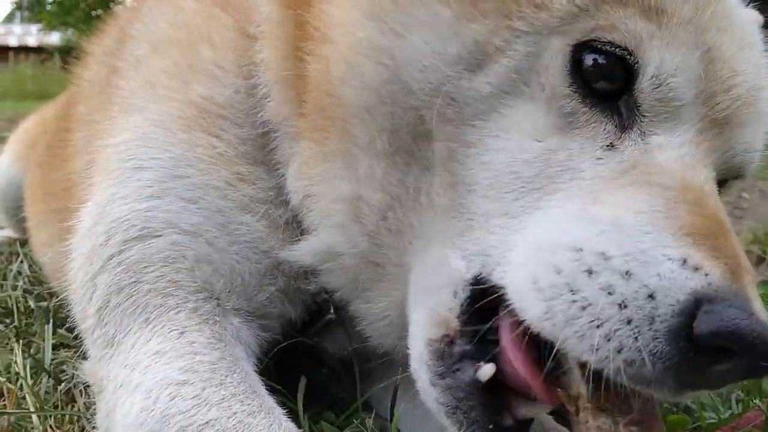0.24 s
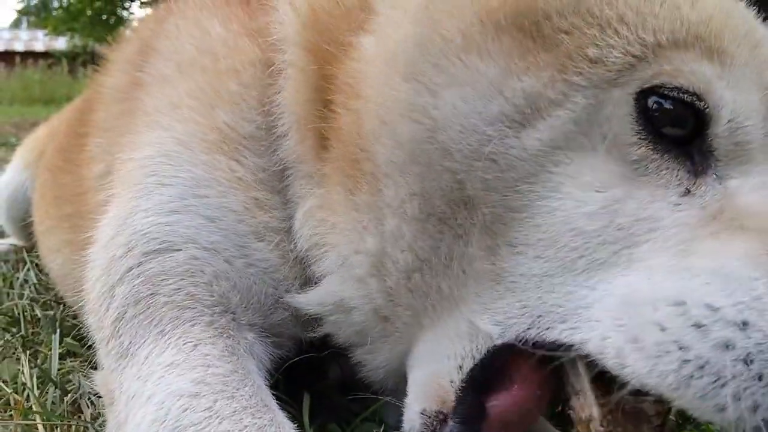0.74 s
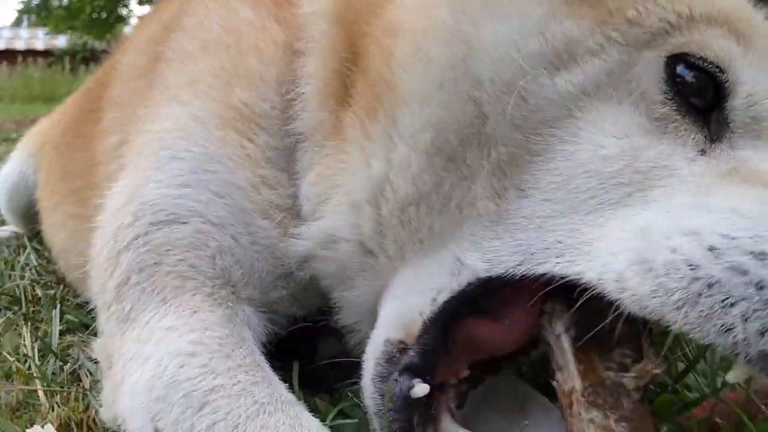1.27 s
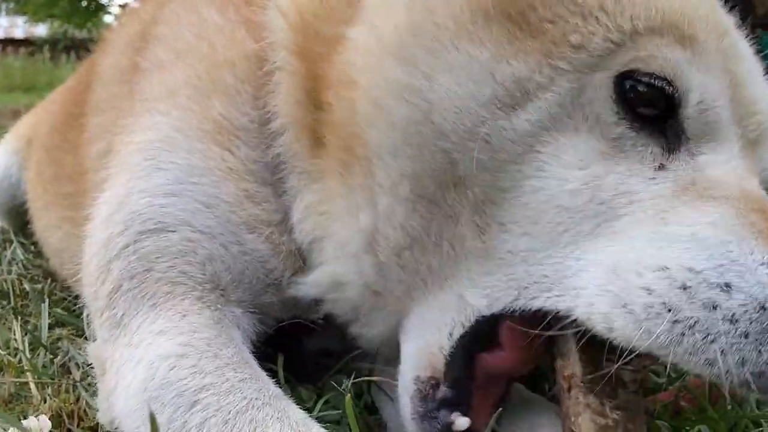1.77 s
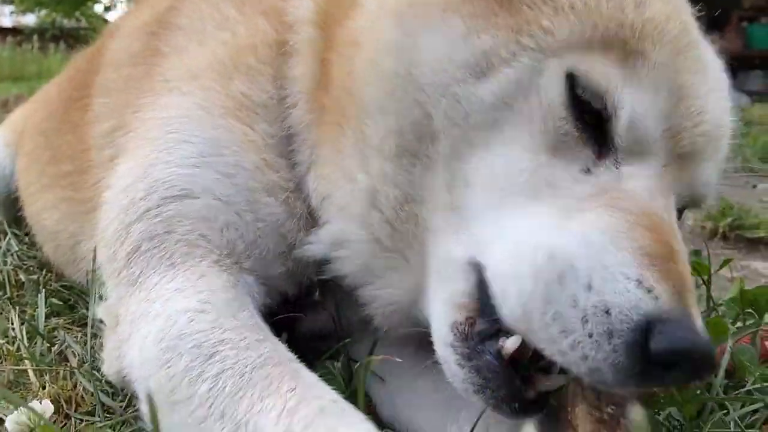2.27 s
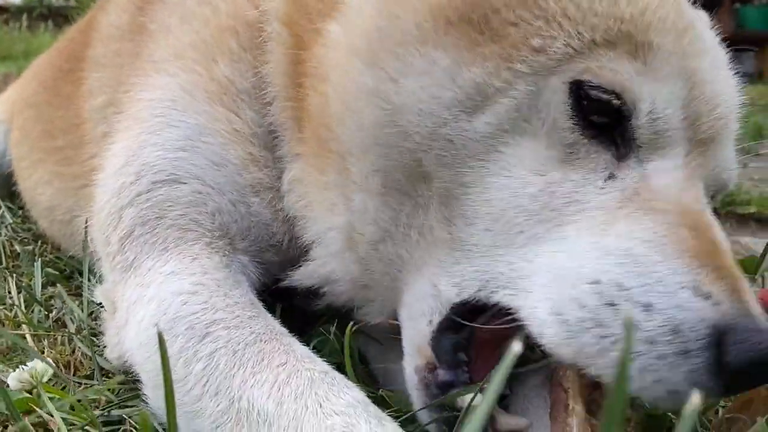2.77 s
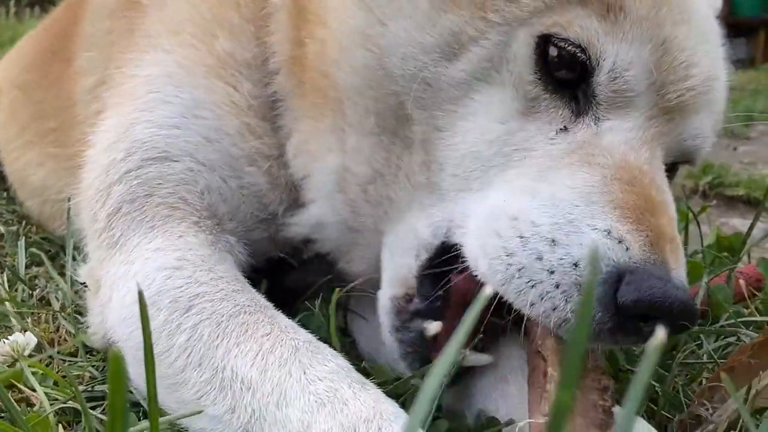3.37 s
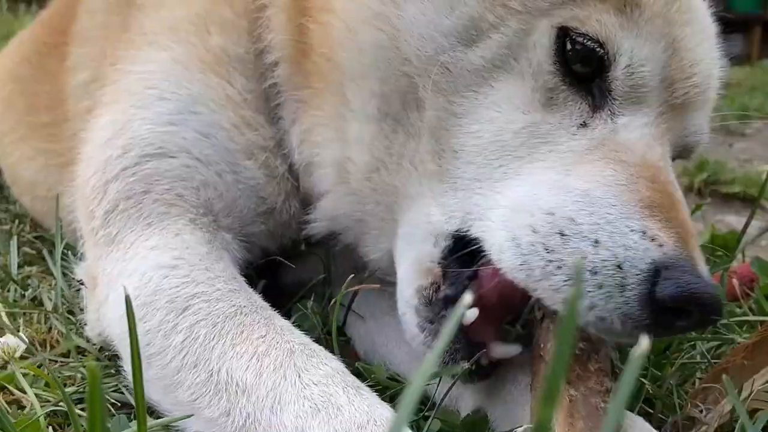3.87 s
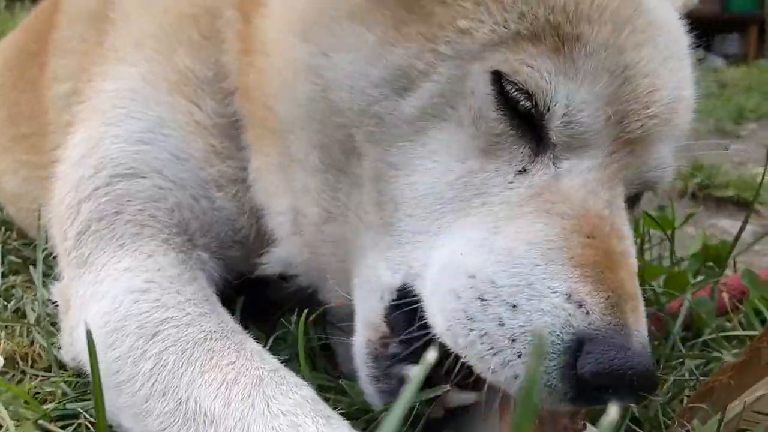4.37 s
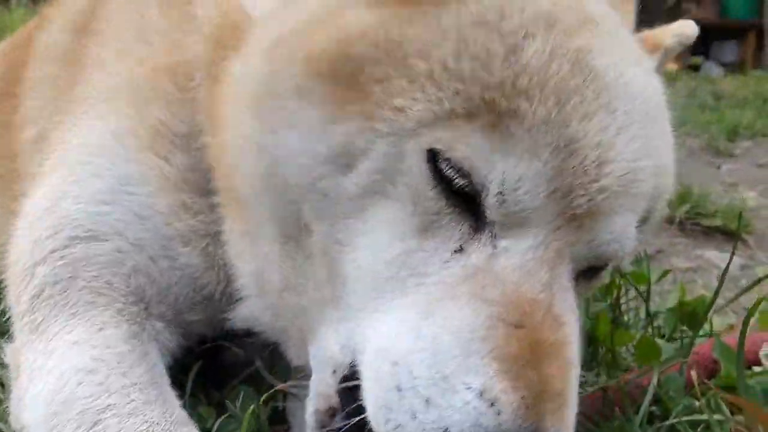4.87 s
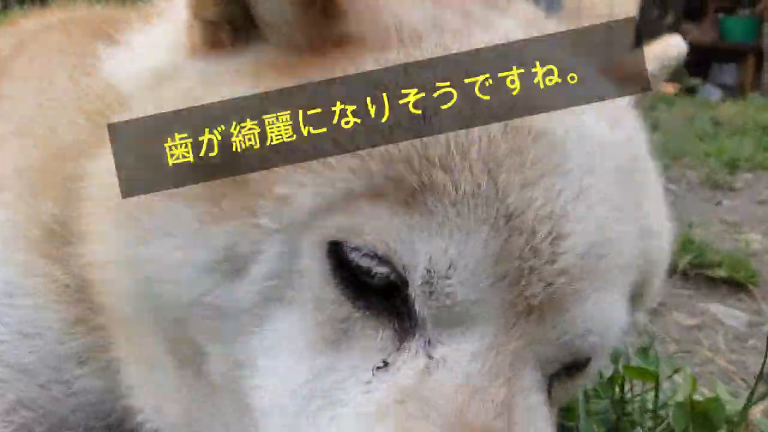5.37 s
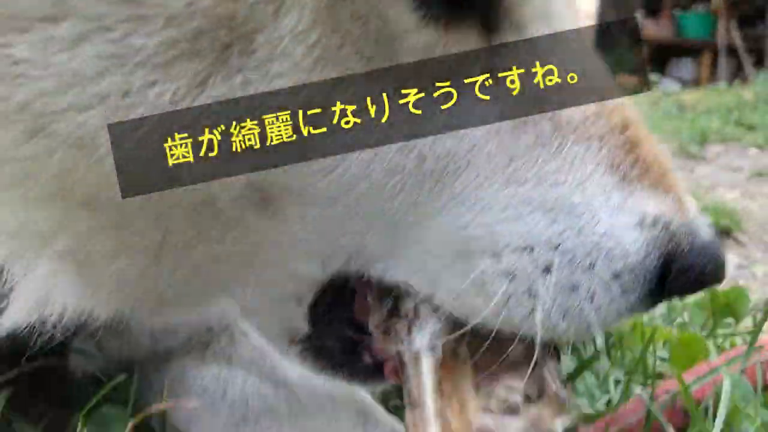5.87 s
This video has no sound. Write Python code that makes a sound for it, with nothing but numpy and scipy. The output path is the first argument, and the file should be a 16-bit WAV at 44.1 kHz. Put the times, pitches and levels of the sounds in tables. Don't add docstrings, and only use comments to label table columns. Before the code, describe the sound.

Close stereo pickup by a phone on grass: a dog gnaws a hard bone. A crackling crunch comes almost at once, a bigger, louder one just before one second, then mostly quiet with small ticks. One sharp crack stands out past two seconds, another softer one at about three and a half. Small nose puffs, wet squeaks and tooth taps fill in, over low distant traffic hum, leaf hiss and a wind bump at the end.

```python
import sys
import numpy as np
from scipy import signal
from scipy.fft import rfft, irfft, next_fast_len
from scipy.io import wavfile
from scipy.ndimage import uniform_filter1d

SR = 44100
rng = np.random.default_rng(int(sys.argv[2]) if len(sys.argv) > 2 else 0)


def log_audio(samples):
    frames = np.atleast_2d(samples).T
    limited = np.clip(frames, -1, 1)
    pcm = np.round(limited * 32767).astype(np.int16)
    wavfile.write(sys.argv[1], SR, pcm)


def level_to_linear(level):
    exponent = np.asarray(level, float) / 20
    return 10 ** exponent


N = 270333
LEAD_MS = 16


def band(x, hz, width_hz):
    return signal.lfilter(*signal.iirpeak(hz, hz / width_hz, fs=SR), x)


def to_peak(x, db, ms):
    return x * level_to_linear(db) / np.sqrt(2 * uniform_filter1d(x ** 2, int(ms * SR / 1000)).max())


def add(out, s, sound):
    i = int(s * SR)
    out[:, i:i + sound.shape[1]] += sound[:, :N - i]


def interaural(left_db, right_db):
    return level_to_linear(np.array([[left_db], [right_db]]))


def fractures(ms, chance, spread_db):
    t = (np.arange(chance.shape[-1]) / SR * 1000 - LEAD_MS) / ms
    release = np.exp(-(t / np.where(t < 0, .4, .7)) ** 2)
    skirts = 0.12 * np.exp(-np.abs(t - .4) / np.where(t < .4, 3.8, 5.1))
    return (release + skirts) * chance[0] * level_to_linear(spread_db * chance[1])


# centre t/s, peak level/dB, length/ms, splinter f/Hz, bright edge level/dB
BONE_SNAPS = [(0.2114, -26, 2.2, 3950, -2), (0.2156, -15.5, 3.3, 3900, 1), (0.219, -14, 1.4, 2200, -9),
              (0.2459, -22, 5.4, 3700, -2), (0.7475, -26, 3.5, 3660, -18), (0.8106, -25, 1.6, 2440, -19),
              (0.82, -26, 1.6, 3300, -14), (0.872, -18, 0.78, 3940, 2), (0.915, -20.5, 1.08, 3770, 4),
              (0.9217, -20.5, 2.4, 3940, -3.5), (0.925, -29, 1.7, 4590, -5), (0.941, -28, 4.3, 3300, 2),
              (0.945, -18, 2.83, 3770, -1), (0.9485, -9.5, 2.8, 3880, -3), (0.9536, -7, 2.4, 2430, -4),
              (0.959, -15, 5.4, 2400, -24), (1.0164, -13, 2, 4070, -12), (1.02, -27, 2.1, 2000, -6),
              (2.345, -17, 1.4, 3010, 0), (2.357, -22, 4.1, 2620, 1), (2.366, -9, 2.1, 3490, -10),
              (2.3679, -6.5, 1.4, 1970, -13), (3.6668, -29, 7.2, 4000, -12), (3.674, -12, 1.2, 5400, -8.5)]
# centre t/s, peak level/dB, splinter f/Hz, bright edge level/dB
BONE_CHIPS = [(0.1363, -28.5, 3100, -22), (0.626, -33, 3780, 4), (1.102, -29, 2710, 13.5),
              (1.1072, -24, 4630, 3), (1.2054, -31, 4700, -7), (1.472, -32.5, 2820, -15),
              (1.569, -33, 2900, -15), (1.7961, -34, 4250, 11.5), (2.0364, -30.5, 3080, -20),
              (2.057, -30.5, 3560, -19), (2.064, -30, 2205, -13), (2.567, -29, 3140, -2),
              (2.606, -29.5, 2030, 5), (2.8068, -34, 4600, -8), (2.813, -36, 3800, -10),
              (3.3715, -32, 3030, -5), (3.5334, -31, 2324, -21), (3.607, -32, 1900, -19),
              (3.7012, -34, 3380, -6), (4.114, -32, 3300, -14), (4.146, -37, 3600, -15),
              (4.1613, -33, 2080, -15), (4.7092, -28, 2390, -23), (4.7938, -24.5, 3100, -4),
              (4.7979, -24, 1850, 2), (4.8005, -27, 5030, -6), (5.2083, -35, 3050, -18),
              (5.2372, -30, 1980, -29), (5.421, -36, 2950, 9), (5.8373, -40, 2510, -11)]
CHIP_MS = 2.85


def cracks(out, table):
    edge_hz, edge_width_hz = 6150, 4200
    shadow_hz = 4800
    chance = rng.standard_normal((len(table), 4, 1600))
    for (s, db, ms, hz, edge_db), c in zip(table, chance):
        left_db = db - 12 + 5.5 * c[3, -1]
        burst_ms = max(ms - .7, .25)
        force = fractures(burst_ms, c[:2], spread_db=4.5)
        chips = fractures(burst_ms, c[[2, 1]], spread_db=4.5)
        splinter = band(band(force, hz, 0.078 * hz), hz, 4.2 * hz)
        body = splinter + 0.37 * band(band(force, 2670, 3600), 1500, 5500)
        edge = band(band(chips, edge_hz, edge_width_hz), edge_hz, edge_width_hz)
        right = to_peak(to_peak(body, 0, .8) + to_peak(edge, edge_db, .8), db, .8)
        ground_echoes = .35 * c[3, :24] * np.exp(-np.arange(24) / 9)
        paths = np.r_[0, 1, ground_echoes]
        left = band(signal.lfilter(paths, 1, right), shadow_hz, 20000)
        add(out, s - LEAD_MS / 1000, np.array([to_peak(left, left_db, .8), right]))


# start t/s, length/s, peak level/dB, hollow bone f/Hz
MOLAR_CRUNCHES = [(0.221, .008, -30, 525), (0.25, .003, -24, 900), (0.31, .009, -35, 1080),
                  (0.756, .005, -31.5, 1380), (0.814, .011, -29, 450), (0.851, .02, -34.5, 1290),
                  (0.884, .011, -45, 1190), (0.927, .002, -38, 1280), (0.964, .002, -27.5, 909),
                  (1.029, .008, -33, 1010), (2.071, .014, -44.5, 925), (2.571, .003, -47, 900),
                  (3.53, .006, -39, 800), (3.655, .009, -41, 1140), (3.675, .001, -20.5, 880),
                  (0.204, .002, -42, 1500), (0.232, .007, -33, 520), (0.268, .002, -41, 1500),
                  (0.762, .007, -31.5, 1700), (0.899, .005, -32.5, 420), (0.184, .002, -43, 1500),
                  (2.905, .004, -40, 900), (2.998, .003, -50, 900)]


def crushing():
    gap_s = 0.0032
    break_ms, break_hz, edge_db = 3.4, 3300, -20
    rub_db, rub_ms = -12, 7.8
    breaks, rubs = [], []
    chance = np.clip(rng.standard_normal((len(MOLAR_CRUNCHES), 12, 5)), -2, 2)
    for (start, length, db, bone_hz), c in zip(MOLAR_CRUNCHES, chance):
        step = np.arange(len(c))
        s = start + gap_s * (step + 0.22 * c[:, 0] * (step > 0))
        size_db = db + 4.5 * c[:, 1] - 60 * (s > start + length)
        lengths_ms = break_ms * level_to_linear(0.92 * c[:, 2])
        rings_hz = break_hz * level_to_linear(1.9 * c[:, 3])
        breaks += zip(s, size_db, lengths_ms, rings_hz, edge_db + 4 * c[:, 4])
        rubs += [(at, level + rub_db, bone_hz, rub_ms) for at, level in zip(s[::3], size_db[::3])]
    return breaks, rubs


# t/s, peak level/dB, ring f/Hz
FIBRES = [(0.127, -33, 4260), (0.1296, -26.5, 3360), (0.1319, -35, 6030), (0.1342, -34.5, 4090),
          (0.184, -29, 3790), (0.2067, -21, 3960), (0.214, -21, 2450), (0.2164, -9, 4130),
          (0.2355, -28, 6500), (0.2502, -22, 4440), (0.2549, -30, 7020), (0.2666, -30, 6330),
          (0.312, -36, 2630), (0.7456, -26, 3830), (0.7507, -24, 3530), (0.753, -30, 3790),
          (0.7665, -30, 3790), (0.7701, -32, 4010), (0.7724, -32, 3700), (0.8082, -29, 2630),
          (0.81, -28.5, 2677), (0.8164, -22, 3830), (0.8217, -19, 3600), (0.8501, -31.5, 6330),
          (0.852, -23, 6420), (0.861, -27, 3920), (0.8655, -35.5, 7360), (0.8945, -28, 3750),
          (0.8961, -28, 3190), (0.9033, -27, 3060), (0.906, -28, 6420), (0.9199, -18, 6680),
          (0.9313, -27, 7020), (0.9369, -23, 3620), (0.9392, -26, 3490), (0.9429, -19.5, 5990),
          (0.948, -8, 6440), (0.9494, -12, 3960), (0.964, -20, 2200), (1.019, -22, 6550),
          (1.021, -15.5, 2060), (1.0271, -19.5, 2580), (1.0291, -22, 2630), (1.101, -23, 7490),
          (1.2016, -28.5, 3570), (1.808, -28, 7320), (2.032, -26, 3360), (2.0636, -32, 2280),
          (2.0688, -34, 2370), (2.356, -23, 2410), (2.57, -28, 3270), (2.807, -20.5, 4070),
          (3.5322, -27, 3660), (3.661, -30, 5170), (3.6639, -30, 4260), (3.6778, -20, 3300),
          (3.7022, -39, 1510), (4.7159, -29, 3190), (5.4198, -20, 6600), (5.719, -36.5, 1510),
          (.2138, -24, 6800), (.2159, -18.5, 6800), (.2225, -28, 7000), (.225, -28, 6800),
               (.2273, -23, 7100), (.2292, -30, 6600), (.239, -33, 7000), (.2408, -33, 7200),
               (.3107, -32.5, 7000), (0.3175, -33, 2200), (.3194, -34, 7000), (.32, -27, 3400),
               (.7463, -31, 6600), (.7608, -29, 6400), (0.7646, -31, 3900), (.8079, -33, 7100),
               (.8548, -35.5, 6500), (.8604, -32, 6800), (.8624, -29, 2400), (.8859, -32, 6400),
               (.8928, -27.5, 4100), (.9039, -30, 6600), (.9047, -32, 2800), (0.9066, -31, 2600),
               (0.925, -17, 6800), (.9377, -31, 6600), (.9395, -28, 6600), (0.9435, -20, 6500),
               (0.9484, -11, 6540), (0.9544, -10, 7000), (1.0205, -21.5, 6500), (1.0239, -27, 6800),
               (1.0251, -29, 6200), (1.0334, -32, 5800), (2.365, -9.5, 2900), (3.6732, -14, 3300),
               (3.7018, -35, 7000), (5.237, -27, 3300), (0.2183, -10.5, 2320), (2.3677, -2.5, 3700),
               (4.7093, -33, 2600), (3.606, -29, 2500), (4.7997, -25, 5800), (2.6068, -27, 5800),
               (.2443, -23, 6300)]


def pricks(out):
    left_db, left_lag_ms = -16.5, .12
    table = FIBRES
    chance = rng.standard_normal((len(table), 2, 64))
    for (s, db, hz), c in zip(table, chance):
        blow = np.zeros((2, 400))
        blow[:, :64] = .13 * c * np.exp(-np.arange(64) / 16)
        blow[[0, 1], [int(left_lag_ms * SR / 1000), 0]] = np.sign(c[0, 0])
        click = band(band(blow, 3000, 5300), 2900, 6300)
        ring = band(band(blow, hz, 890), hz, 3000) + 0.21 * click
        ring = ring / np.abs(signal.hilbert(ring)).max(axis=1, keepdims=True)
        add(out, s - .00025, ring * interaural(db + 1.5 + left_db, db + 1.5))


# centre t/s, peak level/dB, ring f/Hz, length/ms
TOOTH_KNOCKS = [(0.218, -36, 1050, 5.8), (0.2498, -30, 480, 6.12), (0.266, -37, 407, 4.3),
                (0.3186, -40, 1090, 7.4), (0.8175, -31, 403, 7.1), (0.9414, -35.5, 1640, 8.3),
                (1.021, -32, 1370, 5.3), (1.027, -28.5, 946, 6.6), (2.0685, -40, 880, 19),
                (2.347, -42, 1700, 5.66), (2.3557, -42, 1300, 12), (2.3695, -14, 926, 4.65),
                (3.534, -39, 855, 7.6), (3.666, -28, 422, 5.5), (3.6731, -33, 891, 4.6),
                (4.15, -38, 870, 6.5), (4.1539, -40, 930, 6.6), (4.1851, -45.5, 870, 11),
                (4.719, -34.5, 709, 5.7), (4.795, -40, 1790, 7.5), (4.801, -38.5, 1300, 5),
                (5.7102, -40, 668, 3.5), (5.7218, -32, 725, 4.1)]
# centre t/s, peak level/dB, ring f/Hz
TOOTH_TAPS = [(0.213, -42, 1550), (0.8109, -32, 458), (0.916, -40.5, 1260), (0.922, -41.5, 1290),
              (0.9511, -24, 1520), (0.9604, -26, 870), (1.533, -38.5, 950), (2.0577, -33, 980),
              (2.2294, -42, 630), (2.376, -43, 1030), (2.3709, -23, 557), (2.608, -43.5, 920),
              (2.976, -44, 730), (3.608, -29.5, 1128), (3.703, -35, 1037), (3.753, -41.5, 520),
              (3.753, -40, 1050), (4.162, -29.5, 865), (4.7101, -28, 715), (4.927, -39, 463),
              (5.162, -30.5, 643), (5.2095, -40, 570), (5.238, -30, 720), (5.238, -36, 1360),
              (5.2475, -39, 540), (5.2966, -37.5, 520), (5.2977, -43, 1145), (5.7556, -41, 668),
              (5.757, -40, 1700), (5.8369, -37, 560)]
TAP_MS = 3.6


def knocks(out, table):
    chance = rng.standard_normal((len(table), 2, 2400))
    for (s, db, hz, ms), c in zip(table, chance):
        thud_db = -4.5 - 6 * np.log2(hz / 500)
        grinding = np.clip((ms - 3.8) / 16, 0, 1)
        force = fractures(max(ms - 2.6, .3), c, spread_db=4.5) * grinding
        force[int((LEAD_MS - .3 * ms) * SR / 1000)] += 2.0 * np.sign(c[0, 0])
        force = signal.lfilter(*signal.butter(2, 2300, fs=SR), force)
        ring = band(force, hz, 90 + 0.067 * hz) + 0.293 * force
        ring = to_peak(band(band(ring, hz, 1.56 * hz), hz, 2.4 * hz), db + 0.24, 1.95)
        jaw = to_peak(band(band(force, 355, 588), 350, 1140), db + thud_db + 3.5, 0.97)
        skull = to_peak(band(force, 124, 180), db - 26.5, 2.8)
        side_db = 0.84 + 5.0 * hz / 1000
        ring = ring * interaural(-side_db / 2, side_db / 2)
        thud = (jaw + skull) * interaural(1.5, -1.5)
        add(out, s - LEAD_MS / 1000, ring - thud)


# start t/s, length/s, level/dB
BITE_GRIT = [(0.21, 0.024, -36), (0.24, 0.01, -37), (0.308, 0.016, -40), (0.746, 0.03, -44),
             (0.801, 0.019, -41.5), (0.852, 0.023, -50), (0.895, 0.0196, -45), (0.94, 0.0267, -31.5),
             (1.013, 0.017, -31), (2.054, 0.03, -47.5), (2.358, .012, -35), (3.511, 0.0134, -57),
             (3.66, .021, -33.5), (4.139, 0.019, -47), (4.789, 0.01, -42)]


def grit(out):
    for s, length, db in BITE_GRIT:
        chance = rng.standard_normal((3, SR // 20))[:, :int(length * SR)]
        swell = np.sin(np.pi * np.linspace(0, 1, chance.shape[1])) ** .5
        grains = chance[:2] * level_to_linear(6.9 * chance[2]) * swell
        grains = np.pad(grains, ((0, 0), (0, SR // 200)))
        grains = band(grains, 1870, 1800) + .5 * band(grains, 4600, 1900)
        add(out, s, interaural(db - 9, db) * grains / grains.std())


# t/s,
# peak level/dB, ring f/Hz, swell/ms
TOKS = [(5.717, -24, 1340, 1.66), (5.7171, -36.5, 1660, 1.45), (0.309, -38, 1088, 5.3),
        (3.701, -40, 1047, 3), (2.064, -39, 1255, 2.3), (.226, -42.5, 906, 1.3),
        (.227, -40, 330, 2.1), (0.2472, -34.5, 1110, 1.2), (.2503, -43.5, 800, 1.3),
        (.264, -38, 334, 1.8), (0.7527, -45, 887, 1.3), (.7636, -46, 850, 1.4),
        (0.8105, -37, 1100, 0.99), (.8155, -37, 373, 2.1), (0.9019, -40, 398, 1.34),
        (0.9035, -39, 1000, 1.2), (0.9418, -47, 1005, 1.2), (2.365, -30, 228, 2),
        (2.4586, -39, 1030, 0.76), (2.482, -36.5, 1010, 0.84), (2.52, -39, 990, 0.58),
        (3.468, -42, 864, 1.2), (3.482, -45, 1391, 2.6), (3.53, -42.5, 257, 2.34),
        (3.66, -38, 1210, 1.4), (3.672, -42, 246, 3.7), (3.698, -45.5, 332, 1.3),
        (4.151, -32.5, 1240, 0.71), (4.925, -45, 1175, 1.3), (5.208, -44, 890, 1.1),
        (5.836, -45, 980, 1.1), (4.7106, -35, 1500, 1.1), (5.2362, -39, 1640, 1.3)]


def toks(out):
    t = np.arange(SR // 20) / SR
    for s, db, hz, ms in TOKS:
        swell = t * 1000 / ms * np.exp(1 - t * 1000 / ms)
        add(out, s, level_to_linear(db) * swell * np.sin(2 * np.pi * hz * t) * interaural(-3.0, 2.5))


def airflow(length):
    air = rng.standard_normal((3, SR // 4))[:, :int(length * SR)]
    along = np.linspace(0, 1, air.shape[1])
    flow = level_to_linear(15 * band(air[0], 110, 120)) * np.sin(np.pi * along) ** 0.23
    return air, along, flow


def add_puff(out, s, db, puff):
    add(out, s, level_to_linear(db) * puff / puff.std() * interaural(-3.1, 2.4))


# t/s, length/s, level/dB, nose f/Hz
NOSE_PUFFS = [(.118, 0.027, -54, 1390), (0.343, 0.013, -55, 1090), (0.789, 0.041, -58, 601),
              (1.999, 0.019, -54.5, 2030), (2.165, 0.159, -57, 1120), (2.385, 0.18, -52.5, 1050),
              (2.45, 0.07, -58, 1950), (2.64, 0.063, -58.5, 1100), (3.134, 0.091, -55.5, 1190),
              (3.499, 0.036, -51.5, 225), (3.655, 0.034, -52, 1150), (3.7, 0.016, -54, 1050),
              (4.262, .11, -57, 1140), (5.856, 0.022, -57.5, 1050)]


def snorts(out):
    for s, length, db, hz in NOSE_PUFFS:
        air, _, flow = airflow(length)
        add_puff(out, s, db, band(band(air[1] * flow, hz, 150), hz, 414))


# t/s, length/s, level/dB, start f/Hz
GAP_HISSES = [(0.131, 0.039, -53.5, 4300), (0.789, 0.03, -52, 3100), (1.856, 0.056, -51.5, 4700),
              (1.908, 0.072, -58, 4220), (1.999, .022, -53.5, 4500), (2.439, 0.09, -55, 3200),
              (2.426, 0.051, -54, 4380), (2.976, 0.052, -53, 3800), (3.662, 0.0514, -57.5, 4500),
              (3.7, 0.02, -53.5, 4300), (4.259, 0.0396, -52.5, 4500), (4.29, 0.071, -60, 4400),
              (5.073, 0.087, -55, 3900), (5.848, 0.029, -52.5, 2200)]


def hisses(out):
    for s, length, db, hz in GAP_HISSES:
        air, along, flow = airflow(length)
        turns = 2 * np.pi * np.cumsum(hz * (.92 - .14 * along)) / SR
        grains = air[1:] * level_to_linear(3.6 * air[0])
        sway = signal.lfilter(*signal.butter(2, 900, fs=SR), grains)
        add_puff(out, s, db, flow * (sway[0] * np.cos(turns) + sway[1] * np.sin(turns)))


# t/s, length/s, level/dB, start f/Hz, end f/Hz
WET_SQUEAKS = [
    (3.641, 0.0082, -49, 3480, 4900),
    (3.649, 0.012, -45, 4600, 3800),
    (1.865, 0.0073, -53, 4100, 4800),
    (1.875, 0.025, -50.5, 4300, 3417),
    (2.434, 0.01, -49, 3500, 4200),
    (2.443, .008, -49, 4070, 2700),
    (2.447, .014, -51, 2720, 2550),
]


def squeaks(out):
    for s, length, db, start_hz, end_hz in WET_SQUEAKS:
        waver = uniform_filter1d(rng.standard_normal((2, SR // 20)), 40)[:, :int(length * SR)] * 6
        along = np.linspace(0, 1, waver.shape[1])
        glide_hz = start_hz + (end_hz - start_hz) * along
        turns = 2 * np.pi * np.cumsum(glide_hz * (1 + 0.043 * waver[0])) / SR
        level = level_to_linear(db + 3.5 + 3.0 * waver[1]) * np.sin(np.pi * along) ** .4
        add(out, s, level * np.sin(turns) * interaural(-6, 3.5))


# t/s, peak level/dB
SPIT_TICKS = [(0.1604, -43), (0.215, -36.5), (0.2594, -46), (0.626, -43.5), (0.8709, -55.5), (0.919, -44),
              (1.37, -42), (1.795, -46.5), (2.5656, -46), (2.806, -54), (3.3712, -45), (3.6711, -56),
              (4.7924, -56), (5.4184, -59)]


def ticks(out):
    chance = rng.standard_normal((len(SPIT_TICKS), 2, 128))
    for (s, db), c in zip(SPIT_TICKS, chance):
        decay = np.exp(-np.arange(c.shape[1]) / 22)
        add(out, s, level_to_linear(db + 10.5) * band(c * decay, 10000, 5200))


def frequencies():
    size = next_fast_len(N + N % 2, real=True)
    return size, np.arange(size // 2 + 1) * SR / size + 1


def walk(rate):
    k = int(SR / rate)
    steps = np.repeat(rng.standard_normal(N // k + 1), k)
    return 1.47 * uniform_filter1d(uniform_filter1d(steps, k), k)[:N]


# f/Hz, level/dB per Hz
GARDEN_SPECTRUM = [(15, -19.5), (30, -10), (90, -8), (230, -0.5), (420, -2.5), (800, -10), (1400, -8),
                   (5500, -10)]
# f/Hz, common share/0-1
GARDEN_COHERENCE = [(60, 0.99), (130, 0.74), (290, 0.85), (640, 0.53), (1400, 0), (3100, 0.02)]
# f/Hz, level/dB
PORT_BALANCE = [(60, -2), (700, -1), (1500, -4.5), (5000, -6), (7400, -8.5), (9600, -9.5), (10600, -1)]
# f/Hz, level/dB
MIC_RESPONSE = [(5500, 0.5), (7400, 1.5), (8300, -.5), (9200, -12), (10600, -16.5), (14100, -13.5),
                (14700, -49.5)]
# t/s, garden level/dB, wind level/dB
AIR_LEVELS = [(0, -51.5, -54), (.5, -51.5, -64), (1, -50.5, -54), (1.65, -51.5, -69), (2, -51, -59),
              (2.4, -51, -58), (3, -52, -64), (3.8, -50, -61.5), (4.5, -50.5, -62), (5.3, -50, -64.5),
              (5.8, -49.5, -61.5), (5.96, -51, -46.5), (6.04, -50.5, -56.5), (6.13, -50, -41)]


def garden():
    size, hz = frequencies()

    def read(table):
        f, value = np.transpose(table)
        return np.interp(np.log(hz), np.log(f), value)

    common, left, right = rfft(rng.standard_normal((3, size)))
    like = np.clip(read(GARDEN_COHERENCE), 0, 1)
    ports = np.sqrt(like) * common + np.sqrt(1 - like) * np.array([left, right])
    ports *= level_to_linear(read(GARDEN_SPECTRUM) + read(MIC_RESPONSE) + np.outer([1, -1], read(PORT_BALANCE)) / 2)
    out = 0
    for octave in range(-6, 5):
        share = np.cos(np.pi / 2 * np.clip(np.log2(hz / 1000) - octave, -1, 1)) ** 2
        drift_db = 0.51 * walk(3.21) + 0.73 * walk(24.09)
        out = out + irfft(ports * share, size)[:, :N] * level_to_linear(drift_db)
    s, level_db, _ = np.transpose(AIR_LEVELS)
    return out / out.std() * level_to_linear(np.interp(np.arange(N) / SR, s, level_db) + 3.5)


def wind():
    size, hz = frequencies()
    gusts = rfft(rng.standard_normal((2, size)))
    out = irfft(gusts / (1 + (hz / 45) ** 4) * (hz > 12), size)[:, :N]
    s, _, level_db = np.transpose(AIR_LEVELS)
    return out / out.std() * level_to_linear(np.interp(np.arange(N) / SR, s, level_db) - 1.0)


def scene():
    dog, spit = np.zeros((2, 2, N))
    breaks, rubs = crushing()
    chips = [(s, db, CHIP_MS, hz, edge_db) for s, db, hz, edge_db in BONE_CHIPS]
    for table in BONE_SNAPS, chips, breaks:
        cracks(dog, table)
    pricks(dog)
    for table in TOOTH_KNOCKS, [(*tap, TAP_MS) for tap in TOOTH_TAPS], rubs:
        knocks(dog, table)
    for play in grit, toks, snorts, hisses, squeaks:
        play(dog)
    ticks(spit)
    dog = dog - 0.32 * band(dog, 4930, 560) - 0.5 * band(dog, 1610, 200)
    dull = signal.sosfilt(signal.butter(8, 8270, fs=SR, output="sos"), dog)
    shelf = level_to_linear(-5.5) * band(band(dog, 12100, 2500), 14800, 4700)
    return dull + shelf + spit + garden() + wind()


def roll_off(x):
    return signal.sosfilt(signal.butter(12, 15100, fs=SR, output="sos"), x)


def record(dry):
    squeezed = np.tanh(0.29 * dry) / 0.31
    top = signal.ellip(6, .5, 27, 14300, fs=SR, output="sos")
    mix = signal.sosfilt(top, squeezed)
    return roll_off(mix)


dry = scene()
out = record(dry)
log_audio(out)
```